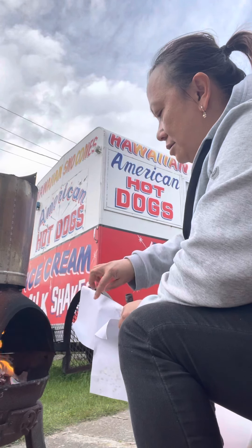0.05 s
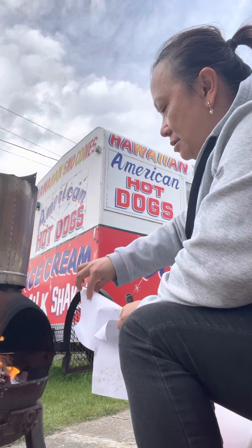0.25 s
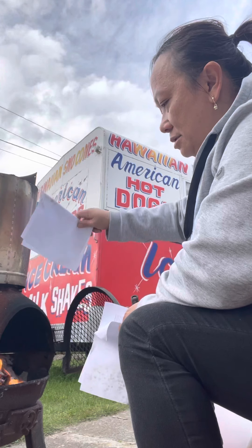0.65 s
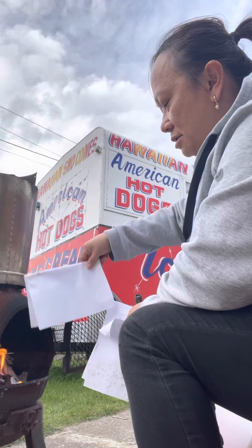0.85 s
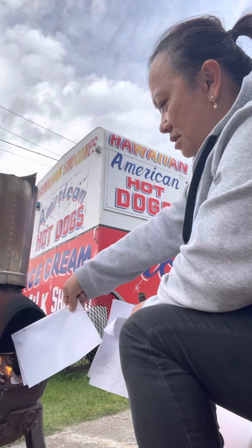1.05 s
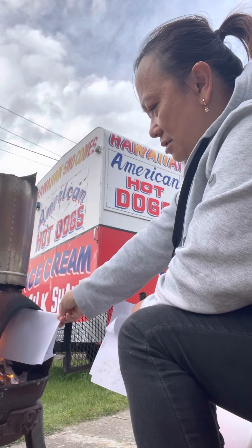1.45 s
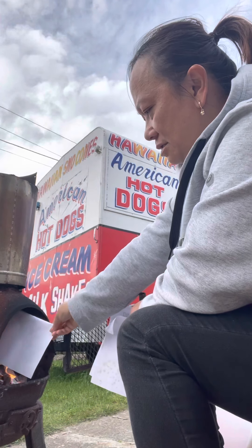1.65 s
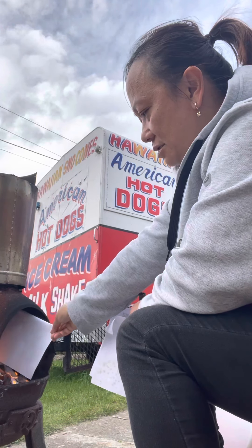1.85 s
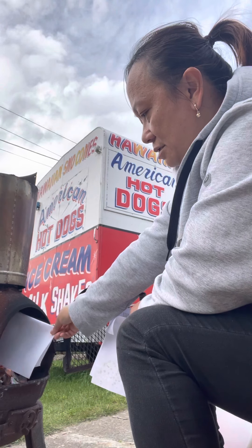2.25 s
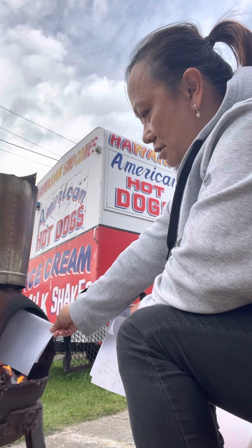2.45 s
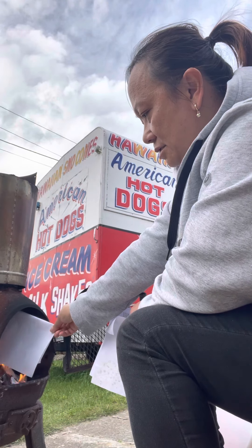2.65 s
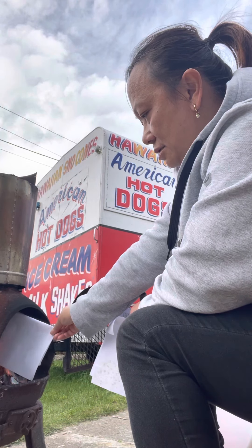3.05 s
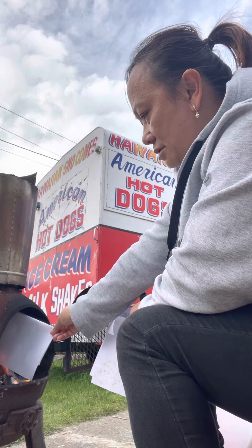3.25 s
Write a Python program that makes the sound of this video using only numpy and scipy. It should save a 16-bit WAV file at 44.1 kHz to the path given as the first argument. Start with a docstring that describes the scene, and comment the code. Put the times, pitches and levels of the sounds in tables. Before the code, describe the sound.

Paper rustles close by, outdoors. A sheet snaps at about 0.2 seconds and slides off a stack with a hiss until 0.7. It swings with soft puffs of air and crackles sharply around 1 second, then scrapes and rustles, fading by 1.7, with a light rustle near 2.2. A small stove fire flutters low and faint throughout. A distant bird gives falling calls around 2.5 and 3 seconds.

```python
"""A sheet of paper is pulled off a stack, swung round and pushed into a small stove, outdoors.
Sliding friction makes it hiss, tiny creases rustle as it bends, and it snaps where it buckles.
Its swings push puffs of air, and nearby surfaces reflect all these sounds.
Underneath, flames flutter in the stove's low resonance; a distant bird gives a few falling
calls over the dull outdoor background."""
import sys
import numpy as np
from scipy import signal
from scipy.fft import rfft, irfft, next_fast_len
from scipy.io import wavfile
from scipy.ndimage import uniform_filter1d, map_coordinates

SR = 44100
rng = np.random.default_rng(int(sys.argv[2]) if len(sys.argv) > 2 else 0)


def persist_wave(psi):
    """Save psi, clipped to +-1, as 16-bit WAV."""
    counts = np.round(np.clip(psi, -1, 1) * 32767).astype(np.int16)
    wavfile.write(sys.argv[1], SR, np.atleast_2d(counts).T)


N = 145530
T = np.arange(N) / SR


def sliding():
    """Friction hisses and bending sheds tiny crease impulses; incoherent strokes add in power."""
    # strokes of the sheet (peak time [s], rise [s], fall [s], hiss level [dB], rustle level [dB])
    strokes = [(.025, .004, .007, -76.5, -67), (.109, .002, .15, -58, -58),
               (.268, 0.022, 0.082, -65.5, -43), (0.374, 0.061, 0.093, -51, -47),
               (0.563, 0.056, 0.1, -57.5, -51), (.717, .004, .046, -55, -55),
               (.86, 0.094, 0.044, -66.5, -61), (.905, 0.017, 0.077, -73, -51.5),
               (0.961, 0.011, 0.036, -68, -45.5), (0.994, 0.029, 0.031, -45, -52),
               (1.034, .008, 0.011, -42, -48.5), (1.064, 0.041, 0.024, -76.5, -44.5),
               (1.144, 0.034, 0.024, -57.5, -46), (1.169, 0.011, .014, -52, -45.5),
               (1.195, 0.019, 0.024, -73.5, -49.5), (1.245, .003, .022, -61, -52),
               (1.324, 0.053, 0.055, -58.5, -48), (1.413, 0.028, 0.052, -66, -48),
               (1.565, 0.052, 0.053, -63, -53), (1.66, 0.061, 0.058, -77.5, -66.5),
               (1.89, 0.02, 0.07, -73.5, -69), (2.085, 0.056, 0.043, -62, -59.5),
               (2.18, 0.072, 0.086, -78.5, -64), (2.62, .04, 0.15, -82, -71.5)]
    # spectrum of friction (frequency [Hz], relative level [dB])
    hiss_spectrum = [(200, -48), (1500, -23.5), (3000, 0.5), (4400, 0.5), (6300, -4.5), (8000, -1),
                     (9500, -2.5), (10800, -1.5), (13000, -5.5), (15500, -6)]
    # spectrum of the bending sheet (frequency [Hz], relative level [dB])
    rustle_spectrum = [(60, -22.5), (180, -3), (300, -2.5), (500, -10), (760, 3), (950, -6), (1250, 0.5),
                       (1700, -3.5), (2130, 6.5), (2500, -5.5), (3000, -2), (3600, -14.5), (4400, -9.5),
                       (5600, -22), (9000, -35), (15500, -28)]
    hiss_power, rustle_power = np.zeros(N), np.zeros(N)
    for peak, rise, fall, hiss_db, rustle_db in strokes:
        swell = np.exp(-((T - peak) / np.where(T < peak, rise, fall)) ** 2)
        hiss_power += (amp(hiss_db) * swell) ** 2
        rustle_power += (amp(rustle_db) * swell) ** 2
    creases_per_s, crease_share = 1500, 0.61
    creases = (rng.random(N) < creases_per_s / SR) * rng.choice([-1, 1], N)
    creases = creases * amp(np.minimum(rng.exponential(size=N), 4))
    grains = np.sqrt(crease_share) * unit(creases) + np.sqrt(1 - crease_share) * rng.standard_normal(N)
    grains = patchy(grains, depth_db=2.5) * amp(2.6 * wobble(84))  # resonances shift, the level flutters
    hiss = np.sqrt(hiss_power) * patchy(noise(hiss_spectrum), depth_db=3.5)
    return hiss + np.sqrt(rustle_power) * coloured(grains, rustle_spectrum)


def snaps(size=8192):
    """Buckling releases elastic energy as a crack, a decaying scatter and a low ring of the sheet."""
    # buckles (time [s], relative level [dB], treble cutoff [Hz], bass gain [dB], rise [s], T60 [s])
    buckles = [(0.2116, -14.5, 9500, 3.5, 0.00089, 0.026), (0.2505, -25, 3970, -3, 0.00096, 0.051),
               (.264, -25, 3495, 9, .003, 0.057), (.297, -29.5, 1790, -3.5, 0.0011, 0.073),
               (.4712, -26.5, 2040, 1, 0.00036, 0.04), (0.5195, -27.5, 1870, 13, 0.0014, 0.084),
               (0.7134, -28, 5170, 8, 0.0018, 0.043), (0.8937, -35, 3920, 2, 0.00087, .03),
               (.9033, -34.5, 2750, -8, 0.00082, 0.023), (0.914, -37.5, 7500, 1, .0006, .025),
               (0.957, -29, 3600, -4, 0.00069, 0.015), (1.0421, -16, 4700, -8.5, .004, 0.053),
               (1.049, -16, 3940, -1.5, 0.0012, 0.059), (1.0539, -24, 4200, -1, 0.0029, 0.075),
               (1.1104, -25, 4730, -15, 0.00094, 0.035), (1.141, -33, 3200, -10, .004, .04),
               (1.1656, -33.5, 3470, -18, .001, 0.024), (1.242, -30.5, 4460, 11.5, 0.0011, 0.027),
               (1.595, -30, 1800, -10, 0.0015, 0.028), (2.1532, -30, 3560, 14, 0.0017, 0.043),
               (2.5098, -40.5, 1790, -1, 0.0015, 0.022)]
    # spectrum common to all buckles (frequency [Hz], relative level [dB])
    snap_spectrum = [(60, -16), (200, -15.5), (500, -16.5), (780, -9), (950, -9.5), (1250, -5), (1650, -10),
                     (2120, 1), (2500, -10), (3000, -5), (3600, -14.5), (4300, -4.5), (5400, -18),
                     (9500, -14.5), (15500, -22)]
    crack_db, crack_s = 7, 0.0015
    body_db, body_t60, body_hz = -14, 0.038, 1200
    out = np.zeros(N + 2 * size)
    t, hz = T[:size], np.fft.rfftfreq(size, 1 / SR)
    for start, db, cutoff_hz, bass_db, rise, t60 in buckles:
        decay = amp(-60 * t / t60) + amp(crack_db) * np.exp(-t / crack_s)
        envelope = decay * (1 - np.exp(-t / rise))
        low_noise = irfft(rfft(rng.standard_normal(size)) / (1 + (hz / body_hz) ** 2), size)
        body = low_noise * amp(body_db - 60 * t / body_t60)
        bass_shelf = gain([(400, bass_db), (1500, 0)], hz)
        colour = gain(snap_spectrum, hz) * bass_shelf / np.sqrt(1 + (hz / cutoff_hz) ** 5)
        burst = rng.choice([-1, 1], size) * envelope
        snap = signal.fftconvolve(burst + body, minimum_phase(colour))[:size]
        snap *= np.linalg.norm(envelope) / np.linalg.norm(snap)
        out[round(start * SR):][:size] += amp(db - 9.5) * snap
    return out[:N]


def scrapes():
    """Friction at a dragging edge briefly concentrates noise in one narrow band."""
    # edge drags (peak time [s], half duration [s], centre frequency [Hz], level [dB])
    drags = [(.35, .09, 4350, -55), (.595, .045, 3450, -57), (1.31, .05, 3000, -57),
             (1.415, .04, 2550, -53)]
    relative_half_width = .08
    out = np.zeros(N)
    for peak, half_s, centre_hz, db in drags:
        white = rng.standard_normal(N)
        band = filtered(white, lambda hz: 1 / (1 + ((hz / centre_hz - 1) / relative_half_width) ** 2))
        out += amp(db) * unit(band) * np.exp(-((T - peak) / half_s) ** 2)
    return out


def flaps(half_s=0.015):
    """The swinging sheet displaces air, radiating soft low-frequency puffs."""
    # puffs of air (time [s], level [dB])
    puffs = [(0.227, -49), (0.321, -48), (0.377, -47), (.415, -45.5), (0.477, -51.5), (.56, -51),
             (.922, -40), (1.058, -40), (2.17, -53.5)]
    # spectrum of a puff (frequency [Hz], relative level [dB])
    puff_spectrum = [(40, -30), (120, -1), (230, 9), (400, -2.5), (900, -7), (2000, -27), (6000, -80)]
    envelope = sum(amp(db) * np.exp(-((T - peak) / half_s) ** 2) for peak, db in puffs)
    return noise(puff_spectrum) * envelope


def fire():
    """Unsteady combustion excites the stove's low resonance; a soft roar grows towards the end."""
    # stove resonance (frequency [Hz], relative level [dB])
    stove_spectrum = [(15, -45), (30, -21), (50, -11.5), (76, 1), (100, -5), (130, -19.5), (200, -23),
                      (500, -54), (2000, -77)]
    # course of the flutter (time [s], level [dB])
    flutter_levels = [(0, -52.5), (.17, -57.5), (.33, -43.5), (.55, -51.5), (.75, -54.5), (.92, -49),
                      (1.15, -46), (1.45, -50.5), (1.62, -43), (1.8, -52.5), (1.98, -50), (2.2, -46),
                      (2.45, -44), (2.8, -49.5), (3.04, -46), (3.3, -55)]
    # upper body of the flames (frequency [Hz], relative level [dB])
    roar_spectrum = [(60, -27), (110, 1), (170, 0.5), (280, -4), (400, -15), (800, -47.5), (3000, -82.5)]
    # course of the roar (time [s], level [dB])
    roar_levels = [(0, -66.5), (1.9, -66.5), (2.5, -64), (3.3, -57.5)]
    flutter = noise(stove_spectrum) * amp(curve(flutter_levels, T) + 1.1 * wobble(14))
    return flutter + noise(roar_spectrum) * amp(curve(roar_levels, T))


def bird():
    """Falling whistles start buzzy through random frequency modulation, then clear and reverberate."""
    # calls (time [s], first frequency [Hz], last frequency [Hz], level [dB])
    calls = [(2.15, 5900, 5700, -83), (2.512, 5350, 4300, -61.5), (2.8, 3700, 3100, -78),
             (3.028, 5700, 3870, -57.5)]
    call_s, buzz_hz, overtone_db, echo_db = .145, 330, -35, -2
    song = np.zeros(N)
    for start, first_hz, last_hz, db in calls:
        progress = np.clip((T - start) / call_s, 0, 1)
        glide = last_hz + (first_hz - last_hz) * (1 - progress) ** 1.55
        buzz = buzz_hz * np.exp(-2 * progress ** 2) * wobble(700)
        phase = 2 * np.pi * np.cumsum(glide + buzz) / SR
        envelope = amp(db) * np.abs(np.sin(np.pi * progress ** 1.68))
        song += envelope * (np.sin(phase) + amp(overtone_db) * np.sin(2 * phase))
    return song + amp(echo_db) * echoes(song, t60=.5)


def air(sway_db=0.96, side_db=-5.5):
    """Dull outdoor noise is partly coherent: a common signal outweighs the channels' difference."""
    # ambient spectrum (frequency [Hz], relative level [dB])
    air_spectrum = [(20, -14), (100, 7.5), (160, 2), (280, -6.5), (420, -7), (570, -13), (740, -8.5),
                    (1000, -15.5), (1500, -21.5), (2100, -19), (2500, -29), (4300, -37.5), (6200, -54.5),
                    (12500, -51), (15500, -62)]
    # course of the common signal (time [s], level [dB])
    air_levels = [(0, -53.5), (1.7, -55.5), (2.4, -56), (3.3, -58.5)]
    level = amp(curve(air_levels, T) + sway_db * wobble(4.84))
    return level * (noise(air_spectrum) + amp(side_db) * np.outer([1, -1], noise(air_spectrum)))


def echoes(x, t60):
    """Diffuse reflections form an exponentially decaying tail, different in each channel."""
    t = T[:SR // 2]
    tail = rng.standard_normal((2, len(t))) * amp(-60 * t / t60) * (t > .003)
    tail /= np.linalg.norm(tail, axis=1, keepdims=True)
    return signal.fftconvolve(x[None], tail, axes=1)[:, :N]


def amp(db):
    """Amplitude ratio of a level in decibels."""
    return 10 ** (np.asarray(db) / 20)


def unit(x):
    """Normalisation to rms 1."""
    return x / np.sqrt(np.mean(x ** 2) + 1e-20)


def curve(points, at):
    """Linear interpolation of a two-column table."""
    return np.interp(at, *np.transpose(points))


def gain(points, hz):
    """Amplitude gain from (frequency [Hz], level [dB]) points on a logarithmic frequency axis."""
    knots_hz, db = np.transpose(points)
    return amp(np.interp(np.log(hz + 1), np.log(knots_hz + 1), db))


def filtered(x, response):
    """Linear filtering multiplies the spectrum by a frequency response."""
    size = next_fast_len(N + SR // 2)
    return irfft(rfft(x, size) * response(np.fft.rfftfreq(size, 1 / SR)), size)[..., :N]


def coloured(x, spectrum):
    """Spectral shaping of x, at rms 1."""
    return unit(filtered(x, lambda hz: gain(spectrum, hz)))


def noise(spectrum):
    """Spectrally shaped Gaussian noise of rms 1."""
    return coloured(rng.standard_normal(N), spectrum)


def wobble(knots_per_s):
    """Smooth random modulation: a spline through Gaussian values."""
    return map_coordinates(rng.standard_normal(int(N * knots_per_s / SR) + 4), [T * knots_per_s])


def patchy(x, depth_db):
    """Random gain over time and frequency gives x short-lived peaks and dips, at rms 1."""
    spectra = signal.stft(x, nperseg=1024)[2]
    field = uniform_filter1d(uniform_filter1d(rng.standard_normal(spectra.shape), 5, 0), 5, 1)
    return unit(signal.istft(spectra * amp(depth_db * unit(field)), nperseg=1024)[1][:N])


def minimum_phase(gains):
    """Folding the cepstrum gives a causal impulse response of this spectral shape, at energy 1."""
    cepstrum = irfft(np.log(np.maximum(gains, 1e-6)))
    half = len(cepstrum) // 2
    cepstrum[1:half] *= 2
    cepstrum[half + 1:] = 0
    impulse = irfft(np.exp(rfft(cepstrum)))
    return impulse / np.linalg.norm(impulse)


def scene(reflection_db=-10):
    """Sources superpose; a phase difference between channels sets the paper slightly to one side."""
    # direct sound of the paper (frequency [Hz], phase lead of left over right [rad])
    phase_lead = [(0, -0.41), (1300, 0.65), (1650, -0.57), (2600, 0.82), (4300, 0.3), (5500, 1.35),
                  (7500, 1.5), (10500, -0.046), (16000, .3)]
    paper = sliding() + scrapes() + snaps() + flaps()
    direct = filtered(paper, lambda hz: np.exp(.5j * np.outer([1, -1], curve(phase_lead, hz))))
    return direct + amp(reflection_db) * echoes(paper, t60=0.047) + fire() + air() + bird()


def record(dry):
    """The microphone is a band-limited filter with a narrow notch, near mono in bass and top."""
    # stereo width (frequency [Hz], side gain [dB])
    side_response = [(50, -32.5), (300, -4.5), (1500, 3), (3000, 0.5), (5500, 6.5), (8500, 5), (11000, 6),
                     (16000, -22)]
    # microphone response (frequency [Hz], gain [dB])
    mic_response = [(20, -1.5), (4600, 1.5), (4780, -1), (4900, -25), (5060, 1.5), (5300, 5), (16000, 0)]
    band_limit_hz = 15900
    mid = (dry[0] + dry[1]) / 2
    side = filtered((dry[0] - dry[1]) / 2, lambda hz: gain(side_response, hz))
    stereo = np.array([mid + side, mid - side])
    return filtered(stereo, lambda hz: gain(mic_response, hz) * (hz < band_limit_hz))


dry = scene()
out = record(dry)
persist_wave(out)
```